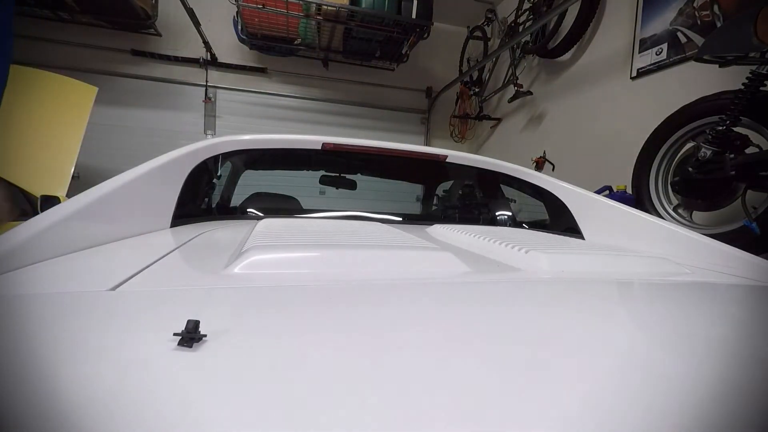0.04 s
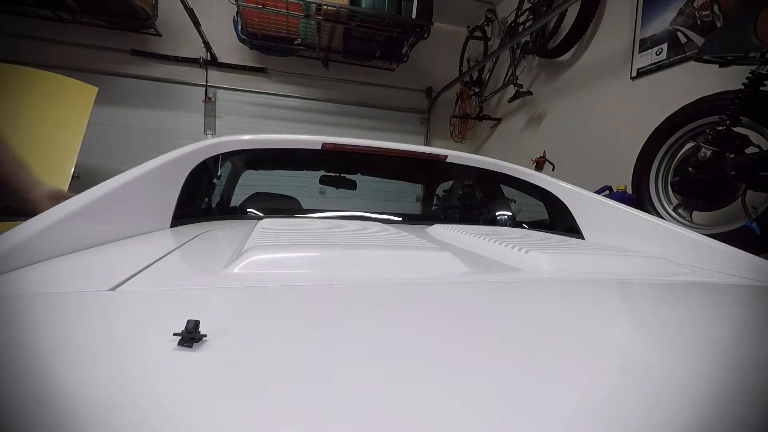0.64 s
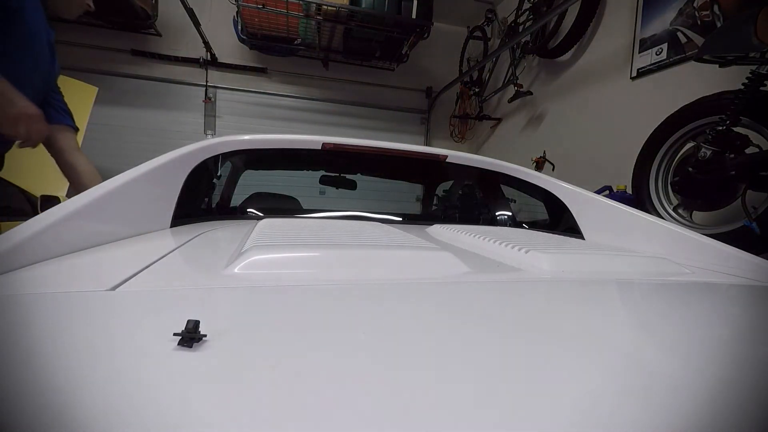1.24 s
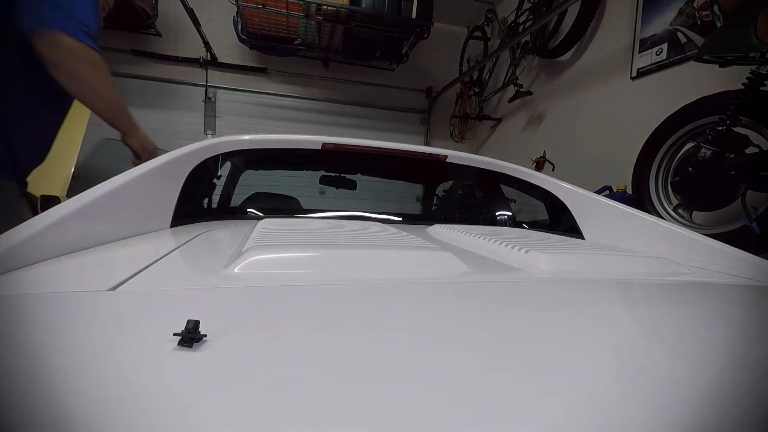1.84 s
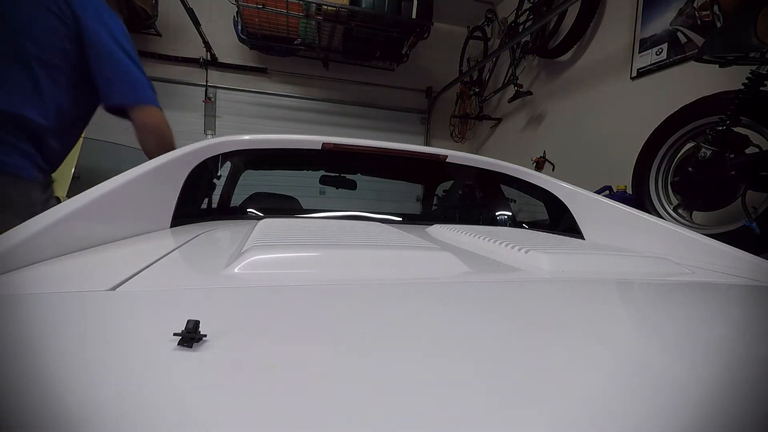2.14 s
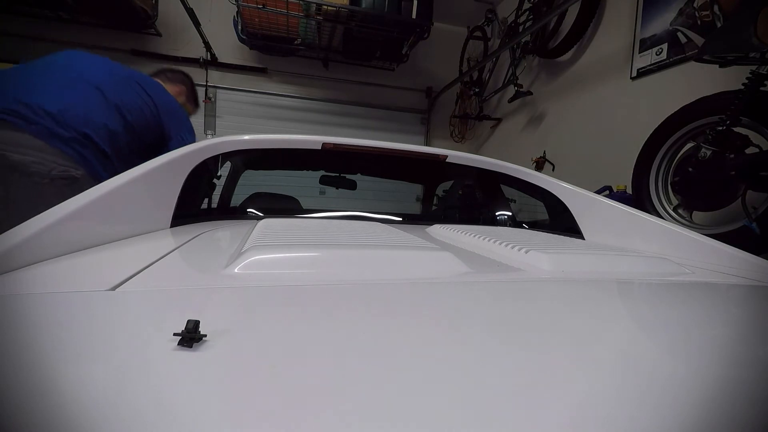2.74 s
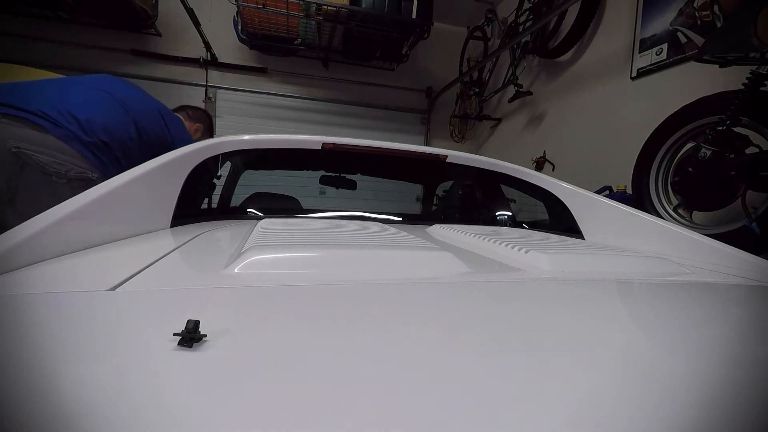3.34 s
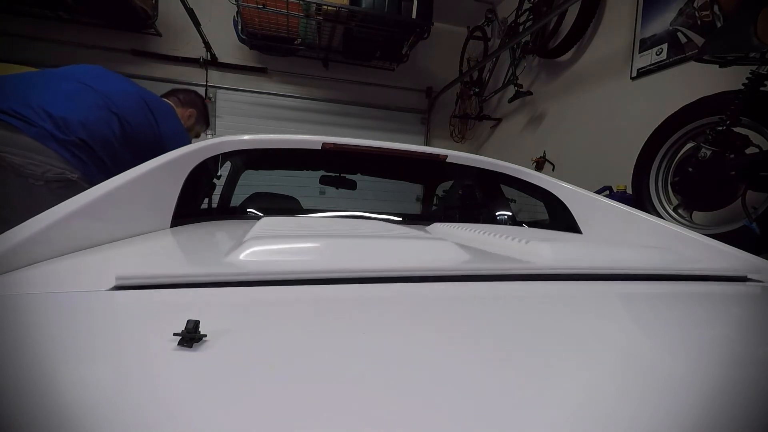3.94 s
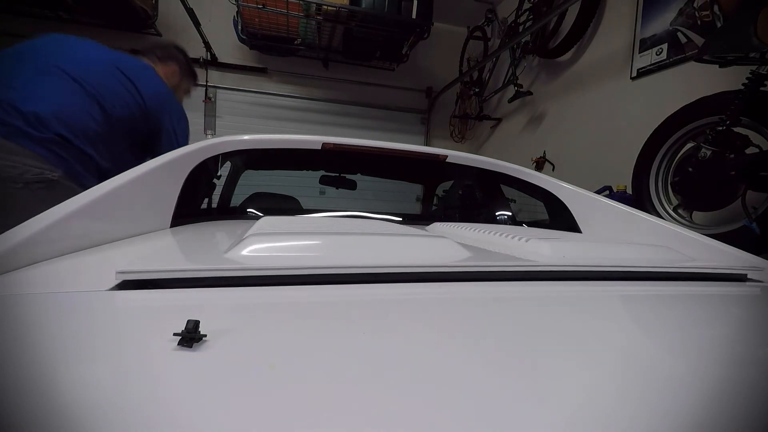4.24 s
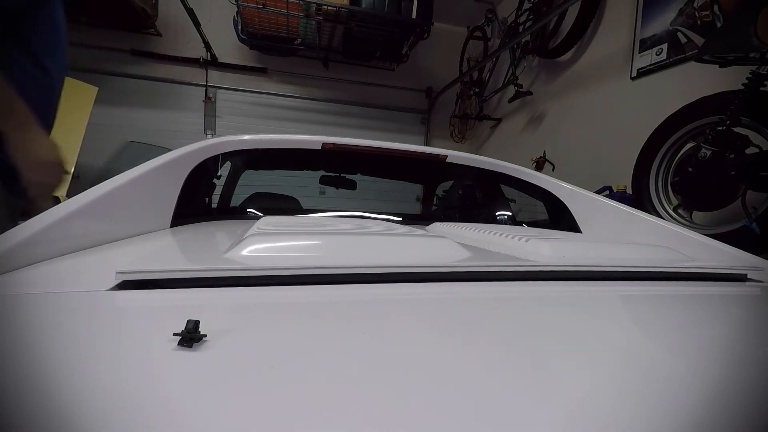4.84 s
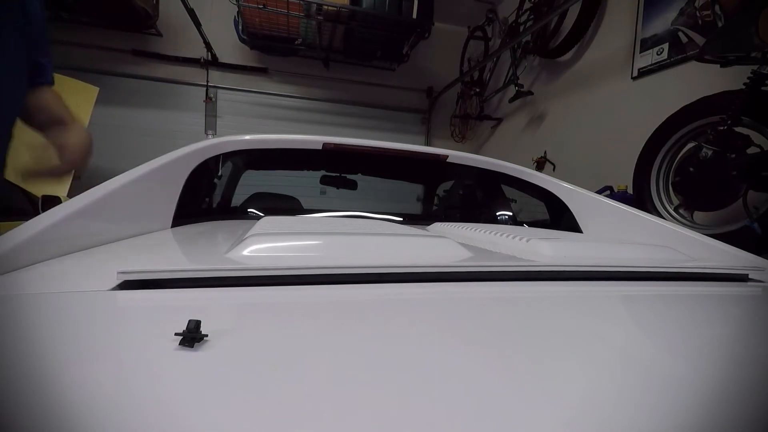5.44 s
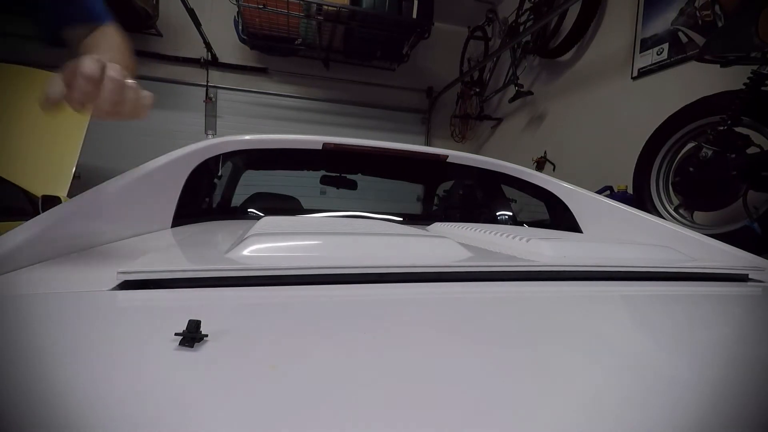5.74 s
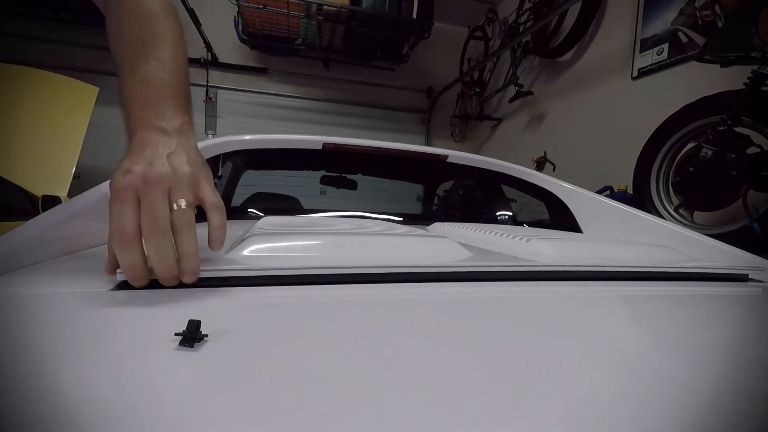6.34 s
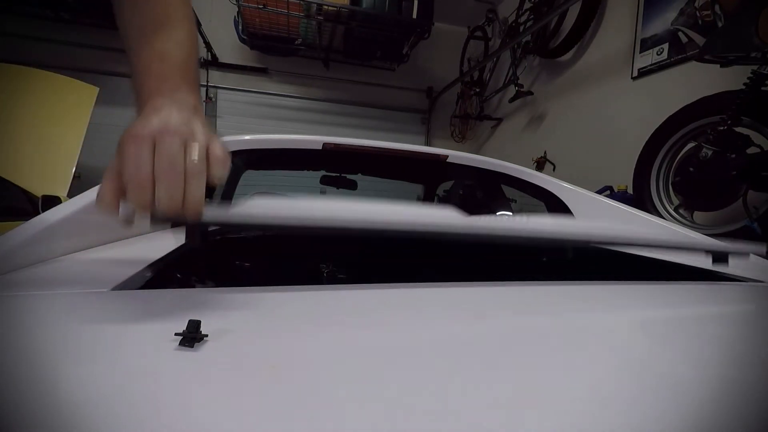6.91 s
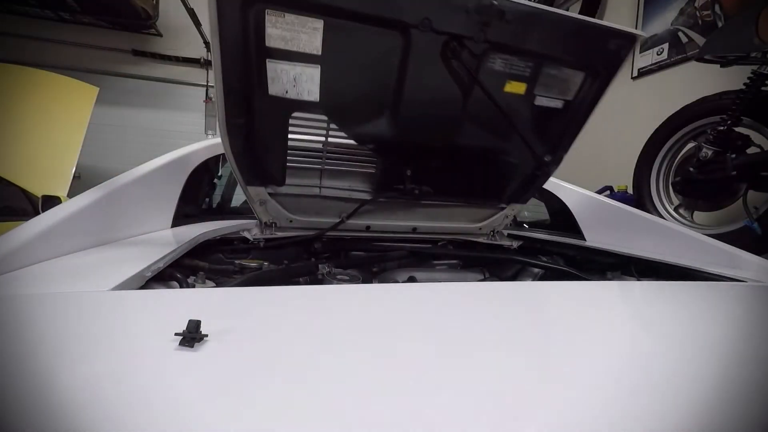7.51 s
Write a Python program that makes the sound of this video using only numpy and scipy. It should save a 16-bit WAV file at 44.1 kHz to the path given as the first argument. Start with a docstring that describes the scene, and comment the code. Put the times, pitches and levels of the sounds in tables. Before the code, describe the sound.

A car door opens in a garage, a latch clunks loose, the door thuds shut and a metal lid knocks softly, over a low hum.

```python
"""Opening an engine lid in a garage

Shoes scuff, clothes rustle; someone opens a car door, leans in and pulls the lid release.
The latch springs open, the door shuts with a deep thud, a hand lifts the sheet-metal lid.
Knocks and clicks are clusters of tiny impacts coloured by the part struck; booms are decaying modes.
The garage reflects the contacts. Behind them a motor hums and slowly runs down."""
import sys
import numpy as np
from scipy import signal
from scipy.fft import rfft, irfft
from scipy.io import wavfile
from scipy.ndimage import uniform_filter1d

SR = 44100
rng = np.random.default_rng(int(sys.argv[2]) if len(sys.argv) > 2 else 0)


def unload_audio(sound):
    """Save the sound as a 16-bit wav file, at the path given as the first command line argument."""
    columns = np.transpose(np.atleast_2d(sound))
    # keep every value between -1 and 1, then stretch to whole-number steps
    steps = np.round(np.clip(columns, -1, 1) * 32767)
    wavfile.write(sys.argv[1], SR, steps.astype(np.int16))


N = 338247
TIME = np.arange(N) / SR

# Levels are relative, ahead of colouring and mix gains.
# motor harmonics 1, 2, 3: level/dB
HUM_DB = [-53.5, -60.5, -69.5]
# garage standing waves: f/Hz, width/Hz, lift/dB
STANDING_WAVES = [(83, 1.5, 6), (90.94, 3, 8), (95.8, 3.6, 7), (165.6, 5.3, 11), (174.15, 2, 9),
                  (184.24, 9.5, 12), (252, 7, 13), (286, 11, 7.5)]
# room noise densities: f/Hz, level/dB
AIR_SPECTRUM = [(180, -47), (300, -6.5), (453, -8), (674, -11.5), (922, -11.5), (1120, -14.5), (1970, -17),
                (3020, -19.5), (3630, -18), (15500, -34.5)]
RUMBLE_SPECTRUM = [(5, -28), (18, -11.5), (27, -3.5), (42, -0.5), (58, 0), (75, -6.5), (130, -12.5),
                   (220, -20), (320, -25.5), (700, -52.5)]
# garage decay: f/Hz, t60/s
GARAGE_DECAY = [(40, 0.81), (120, .52), (400, 0.39), (1000, 0.51), (4000, 0.51), (8000, 0.45),
                (15000, 0.43)]

# shoe scuffs: t/s, level/dB, cutoff/Hz
SCUFFS = [(.207, -48, 5000), (.797, -47, 2000), (2.386, -37.5, 6000), (5.849, -52, 6000),
          (6.372, -49.5, 5000)]
# clothes rustles: t/s, level/dB
RUSTLES = [(.245, -53), (.4, -55.5), (.94, -63), (6.005, -56.5), (6.09, -56.5), (6.39, -57)]
# tone of each, then their shared colour: f/Hz, level/dB
SHOE_TONE = [(110, -15), (350, -5), (1100, 1), (3500, -11.5)]
CLOTH_TONE = [(110, -1), (350, -11), (1100, -2), (3500, -1.5)]
MOVEMENT_COLOUR = [(20, -50), (110, -9.5), (1100, -1.5), (1900, 2), (3500, 1.5), (7000, -5.5), (15500, -17)]

# knocks on the car: t/s, rise/s, fade/s, thump/dB, clack/dB, clack cutoff/Hz
DOOR_KNOCKS = [ (1.243, 0.044, 0.056, -35.5, -43, 15000), (1.344, .017, 0.011, -27.5, -43.5, 15000),
               (1.380, 0.022, 0.029, -33.5, -34.5, 6000), (1.760, 0.0012, 0.029, -61, -37, 1680),
               (1.846, 0.03, 0.023, -34, -29, 1600), (2.060, .038, 0.094, -49.5, -54, 9000),
               (2.700, .08, .15, -50.5, -53.5, 1870), (5.102, 0.0082, 0.011, -29, -36, 7000),
               (5.122, .0031, 0.015, -13, -26, 10100), (5.140, 0.022, .011, -15.5, -23, 12000),
               (5.230, .02, 0.13, -37.5, -41, 12000)]
RELEASE_KNOCKS = [ (3.512, 0.0092, 0.037, -45.5, -34, 14940), (3.754, .014, 0.09, -31.5, -40, 15260),
                  (3.813, .002, .036, -35.5, -32, 4480), (3.854, 0.002, .04, -20, -19, 1630),
                  (3.927, .018, 0.034, -15.5, -19, 3500), (4.0225, 0.0011, .0033, -26.5, -24.5, 12000),
                  (4.028, 0.0068, 0.029, -21, -17.5, 12000), (4.100, 0.028, 0.066, -33.5, -36.5, 10000),
                  (4.365, 0.024, 0.045, -49.5, -46.5, 10050), (4.590, 0.019, 0.038, -53.5, -53, 4000)]
LID_KNOCKS = [ (6.526, 0.0042, 0.027, -48, -44, 1100), (6.563, 0.03, 0.042, -38, -41.5, 1410),
              (6.815, 0.025, 0.03, -66, -46.5, 9050), (6.912, 0.0069, 0.012, -39.5, -33.5, 6000),
              (7.345, 0.039, 0.036, -50, -45.5, 14870)]
# low thump and hard clack of a knock: f/Hz, level/dB
DOOR_THUMP = [(110, -1), (200, -3), (380, 0), (1100, -14.5), (3500, -24.5)]
DOOR_CLACK = [(110, -9), (350, -6), (1100, -0.5), (3500, -4)]
LID_THUMP = [(30, -3), (90, 0.5), (350, -5), (1100, -16), (3500, -28.5)]
LID_CLACK = [(110, -16), (350, -6.5), (1100, -1), (3500, -7)]
# door catch rubbing its striker: t/s, level/dB, cutoff/Hz
CATCH_RUBS = [(1.385, -35.5, 7500), (1.832, -38.5, 15000)]
# tone of the rub: f/Hz, level/dB
CATCH_TONE = [(500, -22), (2000, -8.5), (4200, 1.5), (7000, 0), (9000, 6)]
# metal contacts in the latches: t/s, level/dB, fade/s, part f/Hz
LATCH_CLICKS = [(1.854, -58, 0.036, 10700), (3.512, -45.5, 0.028, 4870), (3.769, -57.5, .0082, 7400),
                (3.8537, -31.5, 0.0066, 6000), (3.986, -42, .004, 6100), (4.022, -20, .0057, 4700),
                (4.11, -41.5, 0.079, 4900), (5.103, -54, .004, 4900), (5.1155, -46, 0.0035, 4930),
                (5.135, -33.5, 0.072, 4200), (6.593, -60, 0.0084, 5000), (6.646, -65, .008, 5220)]

# broad colour of the parts: f/Hz, level/dB
BODY_COLOUR = [(4, -40), (18, -1.5), (30, -2.5), (60, -0.5), (110, -0.5), (3500, -0.5), (6500, -6.5),
               (8500, -17), (12000, -25.5), (15500, -25.5)]
LATCH_COLOUR = [(200, -40), (1000, -18.5), (1800, -5), (2800, -10), (3500, -1), (4100, -6.5), (5000, -5.5),
                (7000, -3.5), (7700, -6.5), (8500, -5), (11500, -10), (15500, -20.5)]
LID_COLOUR = [(4, -51), (30, -9), (110, 5), (250, -1.5), (420, 3), (570, -0.5), (1050, 2.5), (1400, -0.5),
              (1900, 4), (2800, 0.5), (3700, -0.5), (6500, -8.5), (9000, -20), (15500, -26)]
# their resonances: f/Hz, width/Hz, lift/dB
DOOR_PANELS = [(108, 15, 5), (181, 27, 2), (339, 42, -1.5), (403, 17, 0.5), (503.7, 8.7, 4), (810, 230, 2),
               (1230, 92, -0.5), (1680, 83, 1), (3610, 65, 3.5)]
LATCH_STEEL = [(3550, 130, 5), (3720, 120, 3), (4650, 130, 4), (4920, 130, 4), (5270, 130, 3),
               (6990, 220, 6), (8300, 250, 3), (9740, 160, 3)]
LID_PANELS = [(139, 11, 3.6), (173.6, 14, 7), (262, 74, 2), (427, 19, 3), (532, 15, 1.2), (705, 29, 3.7),
              (775, 61, 3.3), (945, 45, 3), (1160, 87, 2.5), (1300, 130, 5), (1570, 82, 2.5),
              (1750, 110, 1.8), (2070, 21, 2)]
# free modes: f/Hz, level after swell/dB, t60/s
DOOR_OPEN_MODES = [(47.2, -23.5, 0.74), (127, -29, .3), (204.3, -43, 0.27)]
LEVER_MODES = [(1400, -17.5, 0.019), (1420, -40, 0.019), (1264, -28, 0.047), (765, -34, 0.061),
               (1297, -44.5, .32), (1527, -44, .27)]
LID_MODES = [(86.5, -26, 2.57), (178, -30, 0.58), (99.7, -18.5, 0.38), (65, -27.5, .45)]
DOOR_SHUT_MODES = [(45.5, -6.5, 0.87), (118.8, -11, 0.47)]
CABIN_MODES = [(27.17, -20.5, 0.8)]
FLOOR_MODES = [(28.86, -32.5, 0.82), (48.6, -35, 0.6)]
PING_MODES = [(5280, -43, 0.015)]
# reflections off the car: delay/s, level/dB
CAR_BOUNCES = [(.0046, -10), (.0095, -10), (0.0124, -6)]


def amp(db):
    """Decibels to gain."""
    return 10 ** (np.asarray(db) / 20)


def unit(x):
    """Scale to unit rms."""
    return x / np.sqrt(np.mean(x ** 2) + 1e-20)


def read(points, hz):
    """Interpolate (f/Hz, value) rows over log frequency."""
    f, value = np.transpose(points)
    return np.interp(np.log(hz + 1), np.log(f + 1), value)


def lift_db(resonances, hz):
    """Sum of bell-shaped resonance peaks."""
    return sum(db / (1 + (2 * (hz - f) / width) ** 2) for f, width, db in resonances)


def soft_db(cutoff_hz, hz):
    """Treble roll-off of a soft contact."""
    return -10 * np.log10(1 + (hz / cutoff_hz) ** 4)


def add(mix, start_s, sound):
    """Mix in place from start_s."""
    part = mix[round(start_s * SR):][:len(sound)]
    part += sound[:len(part)]


def noise(spectrum):
    """Steady shaped noise, unit rms."""
    gain = amp(read(spectrum, np.fft.rfftfreq(N, 1 / SR)))
    return unit(irfft(rfft(rng.standard_normal(N)) * gain, N))


def colour(x, level_db, size=8192):
    """Minimum-phase filter; level_db(hz) is the level per band of equal ratio."""
    hz = np.fft.rfftfreq(size, 1 / SR)
    gain = amp(level_db(hz)) * np.sqrt(SR / 2 / (hz + 10))
    cepstrum = irfft(np.log(gain))
    cepstrum[1:size // 2] *= 2
    cepstrum[size // 2 + 1:] = 0
    return signal.fftconvolve(x, irfft(np.exp(rfft(cepstrum))))


def contact(rise_s, fade_s):
    """Cluster of tiny impacts that swells and dies; same energy at any length."""
    t = np.arange(SR // 2) / SR
    envelope = np.minimum(t / rise_s, 1) * np.exp(-np.maximum(t - rise_s, 0) / fade_s)
    force = envelope * rng.standard_normal(len(t))
    for _ in range(2):  # a blow excites all frequencies about evenly
        flat_spectrum = np.exp(1j * np.angle(rfft(force)))
        force = irfft(flat_spectrum, len(t)) * np.sqrt(envelope)
    return unit(force) * np.sqrt(1 / 12)


def blows(events, spectrum, resonances=()):
    """Contacts, each with its own tone, through the colour and resonances of the part struck."""
    out = np.zeros(N)
    for start_s, rise_s, fade_s, tone_db in events:
        force = contact(rise_s, fade_s)
        blow = colour(force, lambda hz: tone_db(hz) + read(spectrum, hz) + lift_db(resonances, hz))
        add(out, start_s, blow)
    return out


def strokes(rows, spectrum, rise_s, fade_s):
    """Rub events for blows(): one envelope and spectrum, varied strength and softness."""
    def tone(db, cutoff_hz=np.inf):
        return lambda hz: db + read(spectrum, hz) + soft_db(cutoff_hz, hz)
    return [(start_s, rise_s, fade_s, tone(*stroke)) for start_s, *stroke in rows]


def knocks(rows, thump, clack):
    """Knock events for blows(): body thump plus clack of the meeting parts, summed in power."""
    def tone(thump_db, clack_db, cutoff_hz):
        def level_db(hz):
            low = amp(thump_db + read(thump, hz))
            hard = amp(clack_db + read(clack, hz) + soft_db(cutoff_hz, hz))
            return 20 * np.log10(np.hypot(low, hard))
        return level_db
    return [(start_s, rise_s, fade_s, tone(*blow)) for start_s, rise_s, fade_s, *blow in rows]


def ring(modes, start_s, swell_s):
    """Damped sines that build up over swell_s."""
    out, t = np.zeros(N), TIME[:2 * SR]
    tones = sum(amp(db - 60 * (t - swell_s) / t60_s) * np.sin(2 * np.pi * hz * t)
                for hz, db, t60_s in modes)
    add(out, start_s, tones * np.minimum(t / swell_s, 1) ** 2)
    return out


def motor(start_hz=96.15, sag_hz_per_s=0.77, sag_hz_per_s2=0.12):
    """Hum slowing ever faster; harmonics waver, and swell as they cross the room's standing waves."""
    pitch_hz = start_hz - sag_hz_per_s * TIME - sag_hz_per_s2 * TIME ** 2
    turns = np.cumsum(pitch_hz) / SR
    waver_db = 0.53 * noise([(0, 6.5), (4, -19), (20, -58.5), (60, -140)])
    hum = np.zeros(N)
    for k, db in enumerate(HUM_DB, 1):
        gain = amp(db + lift_db(STANDING_WAVES, k * pitch_hz) + waver_db)
        hum += gain * np.sin(2 * np.pi * (k * turns + rng.random()))
    return hum


def room_noise():
    """Steady airy hiss over a low rumble."""
    return amp(-60.5) * noise(AIR_SPECTRUM) + amp(-48.5) * noise(RUMBLE_SPECTRUM)


def shoes_and_clothes():
    """Soles and cloth rub in short strokes."""
    shoes = strokes(SCUFFS, SHOE_TONE, rise_s=0.0027, fade_s=0.039)
    clothes = strokes(RUSTLES, CLOTH_TONE, rise_s=0.015, fade_s=0.034)
    return blows(shoes + clothes, MOVEMENT_COLOUR)


def garage(x, taps_per_s=5000, smooth_hz=70, length_s=0.9):
    """Dense reflections, decaying per band; each call is another place in the room."""
    taps = rng.choice([-1., 1.], SR) * (rng.random(SR) < taps_per_s / SR)
    hz, t, bands = signal.stft(taps, SR, nperseg=256)
    decay = amp(-60 * t / read(GARAGE_DECAY, hz)[:, None])
    tail = signal.istft(bands * decay, SR, nperseg=256)[1][:SR]
    build_up = np.clip((TIME[:SR] - 0.002) / 0.0034, 0, 1)
    spectrum = rfft(tail * build_up)
    spectrum /= np.sqrt(uniform_filter1d(abs(spectrum) ** 2, smooth_hz))  # fine modes, no broad colour
    tail = irfft(spectrum, SR) * build_up * (TIME[:SR] < length_s)
    return signal.fftconvolve(x, tail / np.linalg.norm(tail))[:N]


def car_door():
    """Handle, stops and catch knock the panels as the door opens and shuts; the catch rubs its striker."""
    rubs = strokes(CATCH_RUBS, CATCH_TONE, rise_s=0.022, fade_s=0.02)
    return blows(knocks(DOOR_KNOCKS, DOOR_THUMP, DOOR_CLACK) + rubs, BODY_COLOUR, DOOR_PANELS)


def low_booms():
    """Low modes of the opening door, the released lid and the floor."""
    door = ring(DOOR_OPEN_MODES, start_s=1.356, swell_s=0.011)
    lid = ring(LID_MODES, start_s=3.94, swell_s=0.014)
    floor = ring(FLOOR_MODES, start_s=5.82, swell_s=0.074)
    return door + lid + floor


def latches(part_width_hz=1100, part_db=7, rise_s=0.0008):
    """Steel parts snap together: bright contacts, each lifted at the pitch of its part."""
    out = np.zeros(N)
    for start_s, db, fade_s, part_hz in LATCH_CLICKS:
        resonances = list(LATCH_STEEL) + [(part_hz, part_width_hz, part_db)]
        force = contact(rise_s, fade_s)
        click = colour(force, lambda hz: db + read(LATCH_COLOUR, hz) + lift_db(resonances, hz))
        add(out, start_s, click)
    return out


def release_lever():
    """The pulled lever rings briefly."""
    return ring(LEVER_MODES, start_s=3.5101, swell_s=0.00018)


def bounced(x):
    """Direct sound plus first reflections off the car."""
    out = x.copy()
    for delay_s, db in CAR_BOUNCES:
        add(out, delay_s, amp(db) * x)
    return out


def lid_release():
    """The cable tightens, the latch lets go; both knock the lid's panels."""
    return blows(knocks(RELEASE_KNOCKS, LID_THUMP, LID_CLACK), BODY_COLOUR, LID_PANELS)


def door_slam(start_s=5.137):
    """The panels boom; the pumped cabin air keeps heaving below them."""
    return ring(DOOR_SHUT_MODES, start_s, swell_s=0.00018) + ring(CABIN_MODES, start_s, swell_s=0.33)


def ping():
    """Tiny high ping as the person steps away."""
    return ring(PING_MODES, start_s=5.848, swell_s=0.001)


def lid_lift():
    """Sheet metal knocks as fingers grip the edge and the lid swings up."""
    return blows(knocks(LID_KNOCKS, LID_THUMP, LID_CLACK), LID_COLOUR)


def scene():
    """Mono mix: door off to the side, mostly heard through the room; latch and lid near."""
    door, release, lid = car_door(), lid_release(), lid_lift()
    movement, clicks, lever = shoes_and_clothes(), latches(), release_lever()
    direct = (amp(-9) * door + amp(-4) * release + amp(-6.5) * lid + amp(-10) * movement
              + amp(2.5) * clicks + bounced(lever) + ping())
    reflected = garage(amp(-1) * door) + garage(amp(-3) * release)
    reflected += garage(amp(-3) * lid + amp(-0.6) * movement)
    reflected += garage(amp(-1) * clicks + amp(-7) * lever)
    return (direct + reflected + door_slam() + low_booms() + motor() + room_noise())[None]


def record(dry):
    """Full-scale clip, then low-pass."""
    cutoff_hz = 15650
    lowpass = signal.firwin(255, cutoff_hz, window=("kaiser", 9), fs=SR)
    return signal.oaconvolve(np.clip(dry, -1, 1), lowpass[None], "same")


dry = scene()
out = record(dry)
unload_audio(out)
```